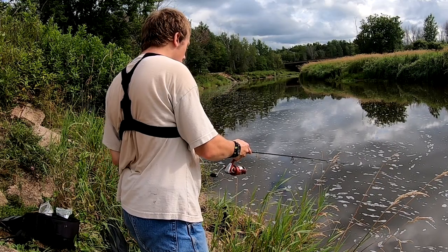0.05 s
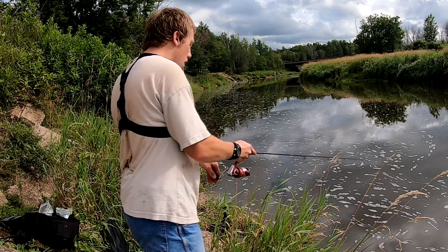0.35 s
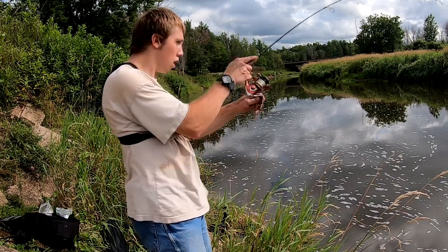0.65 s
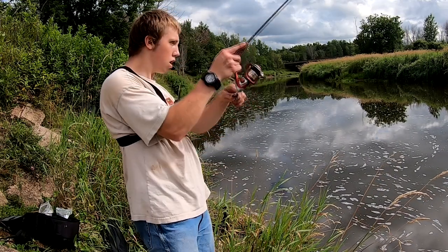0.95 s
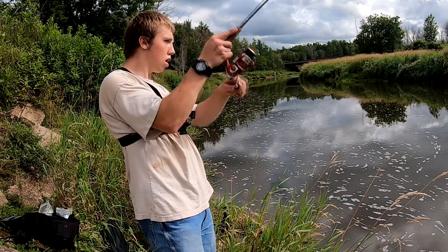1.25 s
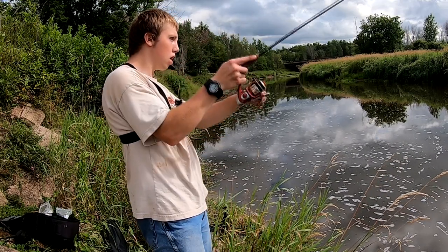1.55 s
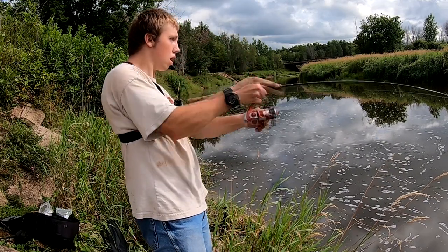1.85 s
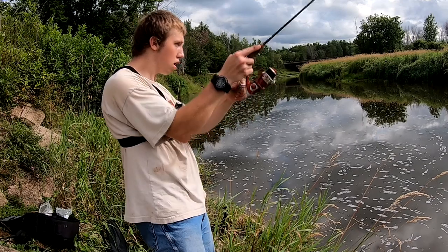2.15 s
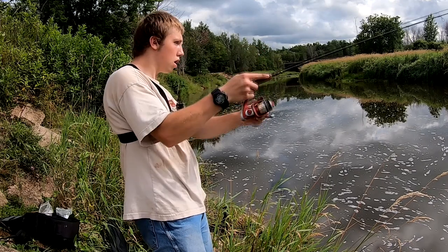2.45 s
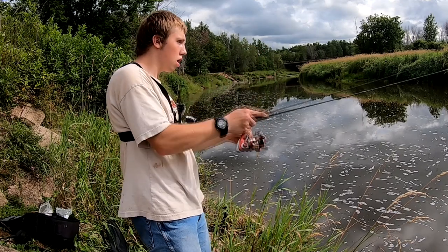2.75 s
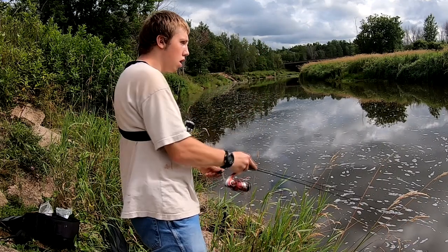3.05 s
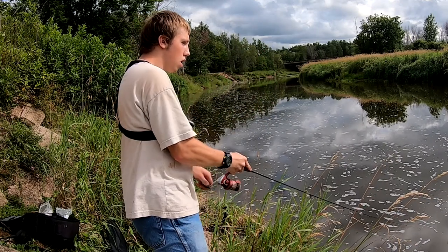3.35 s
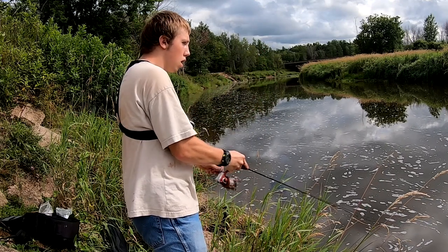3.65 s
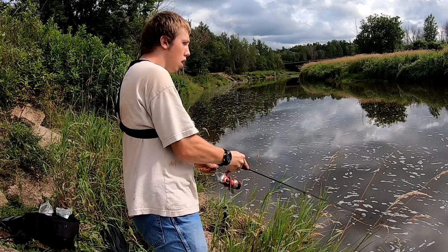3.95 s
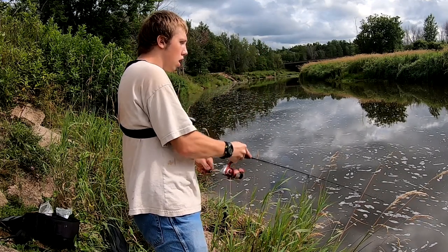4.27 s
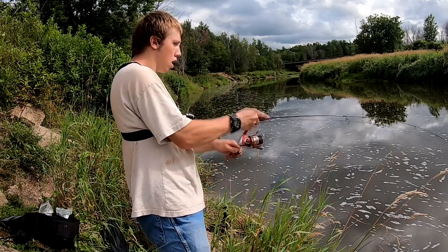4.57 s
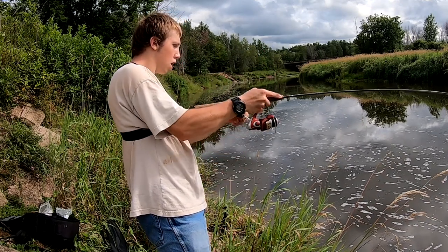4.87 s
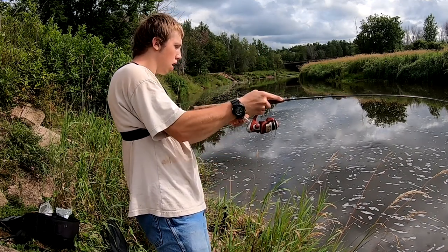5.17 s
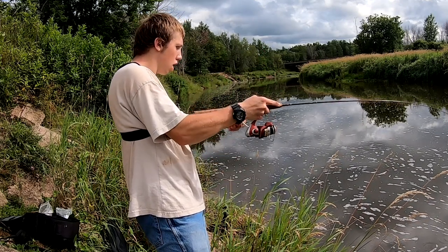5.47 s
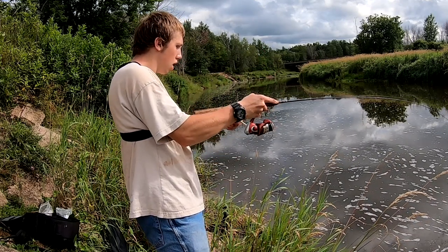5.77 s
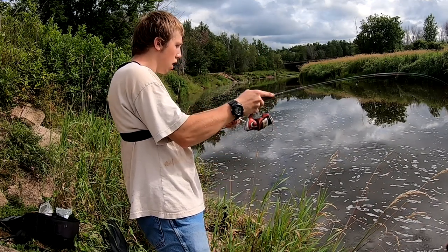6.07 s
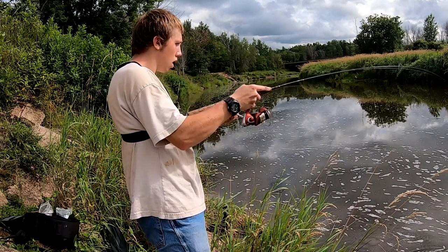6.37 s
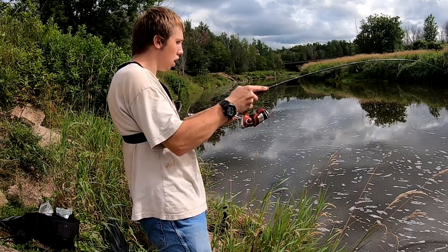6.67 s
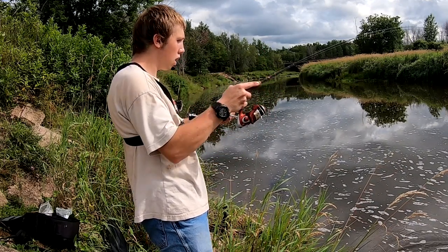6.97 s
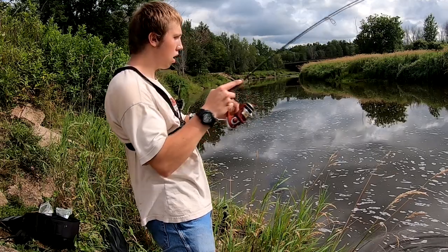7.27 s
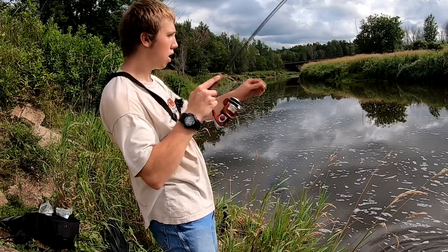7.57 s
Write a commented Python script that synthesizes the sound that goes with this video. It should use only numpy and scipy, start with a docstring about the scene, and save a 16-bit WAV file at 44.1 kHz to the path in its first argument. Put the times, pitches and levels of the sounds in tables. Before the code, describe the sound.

A fishing reel ticks, whirrs and briefly buzzes, then a hooked fish splashes and thrashes in a river under a light breeze.

```python
"""A light breeze blows over a quiet riverbank, and a small bird calls now and then. An angler's tackle
ticks and the gears of a spinning reel whirr. Twice the rod swishes up to set the hook, and each time the
drag (the reel's slipping brake) buzzes and leaves the spool ringing. From about 2 s a fish splashes,
then the angler winds it in. From 5 s it thrashes again, with spray, ticking drops, ringing bubbles and
one deep plop just after 6 s. The last drops patter back onto the river and the breeze blows on."""
import sys
import numpy as np
from scipy import signal
from scipy.fft import rfft, irfft, next_fast_len
from scipy.io import wavfile
from scipy.ndimage import uniform_filter1d

SR = 44100
rng = np.random.default_rng(int(sys.argv[2]) if len(sys.argv) > 2 else 0)


def bounce(signal):
    """Save signal as a 16-bit WAV file at the path given by the first command-line argument."""
    frames = np.transpose(np.atleast_2d(signal))
    limited = np.clip(frames, -1, 1)
    pcm = np.round(limited * 32767).astype(np.int16)
    wavfile.write(sys.argv[1], SR, pcm)


N = 340452
T = np.arange(N) / SR

# Levels in a table compare its rows; the functions add their own gains on top.
# tone of the hiss of leaves and river: frequency_hz, level_db
AIR_TONE = [(59, -40), (100, -3), (335, -9), (389, -8), (433, -11), (705, -11.5), (872, -11.5), (1360, -14),
            (2000, -17.5), (3120, -20), (3320, -22), (5420, -14.5), (7450, -17.5), (11600, -19.5),
            (16000, -23)]
# tone of the wind's rumble: frequency_hz, level_db
RUMBLE_TONE = [(2, 26), (6, 32.5), (11, 21), (20, 5.5), (40, 0), (70, -4.5), (110, -13), (220, -31.5)]
# gusts of wind: peak_s, half_width_s, level_db
WIND_GUSTS = [(.52, .12, -50), (2.55, 0.21, -53), (3.76, 0.15, -66), (4.82, 0.041, -48.5),
              (6.85, 0.34, -51), (7.62, 0.073, -60)]
# tone of the difference between left and right: frequency_hz, level_db
SIDE_TONE = [(25, -25), (60, -21), (140, -23), (280, -12.5), (600, -3), (1200, -10.5), (2200, -25),
             (4000, 7.5), (8000, 16), (16000, 0.5)]
# tone of small swirls of air: frequency_hz, level_db
EDDY_TONE = [(25, 11), (130, -17), (300, -3), (600, -11)]
# bird calls: start_s, length_s, top_pitch_hz, level_db
BIRD_CALLS = [(1.738, .052, 3580, -47), (3.355, .046, 3520, -49), (4.315, .042, 3520, -51),
              (5.466, .052, 3520, -49), (6.745, .05, 3580, -47)]
# the fish ploughs along the surface: peak_s, half_width_s, spray_db, churn_db
FISH_SURGES = [(2.93, 0.15, -40, -46), (6.02, 0.18, -46.5, -49)]
# the fish slaps the water: start_s, length_s, spray_db, churn_db
FISH_SLAPS = [(2.111, 0.037, -39.5, -48.5), (2.165, 0.044, -48, -49.5), (2.475, 0.019, -32.5, -46),
              (2.565, 0.01, -37.5, -42), (2.578, 0.02, -36.5, -43.5), (2.637, 0.017, -52, -45.5),
              (2.688, .04, -52, -49), (5.025, .014, -49, -61), (5.072, .012, -41.5, -62),
              (5.252, 0.016, -41, -68), (5.345, 0.044, -44.5, -43.5), (5.392, 0.013, -35, -37.5),
              (5.604, 0.01, -43.5, -48), (5.725, .0098, -34.5, -52), (5.75, .0064, -39, -41.5),
              (5.835, 0.027, -31, -35.5), (5.903, 0.014, -39, -44), (6.014, 0.0068, -33, -49),
              (6.057, .021, -34, -36.5), (6.144, 0.018, -45, -31), (6.163, 0.019, -50, -33)]
# tone of flying spray: frequency_hz, level_db
SPRAY_TONE = [(880, -20), (1500, 1), (1640, 0), (2830, -6.5), (2970, -9.5), (5330, 4), (5770, 2.5),
              (7690, 4), (14100, -5.5), (16000, -15)]
# tone of sloshing water: frequency_hz, level_db
SLOSH_TONE = [(150, -23.5), (280, -8.5), (450, -1.5), (800, -0.5), (1800, -0.5), (3500, -8.0)]
# the biggest pockets of trapped air: start_s, pitch_hz, level_db, life_cycles
BIG_BUBBLES = [(2.580, 1850, -18.5, 18), (2.579, 1070, -28.5, 25), (2.694, 1054, -27, 20),
               (2.723, 616, -29.5, 15), (3.093, 1240, -36, 28), (3.212, 1200, -39, 50),
               (4.842, 1900, -35, 14), (5.035, 1870, -38, 40), (5.075, 1550, -39.5, 40),
               (5.363, 1190, -26, 22), (5.37, 950, -26, 14), (5.371, 700, -29, 20),
               (5.381, 3200, -30.5, 31), (5.386, 2380, -29, 31), (5.552, 1710, -38, 78),
               (5.612, 1750, -30, 19), (5.857, 1110, -26.5, 18), (5.873, 1650, -26.5, 29),
               (5.922, 1620, -27.5, 26), (5.984, 1380, -29, 29), (6.074, 720, -26, 24),
               (6.092, 650, -32, 32), (6.132, 620, -30, 26), (6.142, 2820, -24.5, 30),
               (6.463, 5740, -30.5, 52), (6.492, 1000, -39, 21), (6.1505, 760, -15.5, 14),
               (6.153, 435, -31, 36), (6.1568, 960, -8, 13), (6.157, 1340, -16, 10)]
# sharp ticks of reel and rod and, amid the splashing, of water drops:
# start_s, click_db, snap_db (compared with the click), knock_db
SHARP_TICKS = [(0.371, -37.5, -11, -65), (.4084, -37.5, -12, -65), (.4515, -38, -21, -50),
               (.63, -35, -10, -36.5), (0.6806, -25, -8.5, -28.5), (0.7608, -19, -0.5, -29),
               (0.7671, -26, 2, -19), (0.8628, -25, -8, -47), (0.9257, -33.5, -14, -46),
               (1.8933, -30, -7.5, -31.5), (2.0161, -24, -13, -39), (2.287, -23.5, -18, -41),
               (2.3977, -23, -22, -48), (2.9921, -25.5, -13, -57), (4.9509, -30, -8, -62),
               (5.0462, -34.5, -23, -61), (5.331, -35, -22, -49), (5.5237, -34.5, -4, -55),
               (5.965, -32, -19, -42), (6.1913, -34, -6, -50), (6.2434, -36, -24, -43),
               (6.6733, -40, -7, -59)]
# tone of a tick's click: frequency_hz, level_db
CLICK_TONE = [(180, -40), (300, 0), (457, -8.5), (1460, 0.5), (2000, 1), (3660, 4.5), (5340, 12.5),
              (6490, 9), (8140, 9.5), (9750, -15.5), (11000, -50), (14300, -39), (22000, -120)]
# upward sweeps of the rod: start_s, length_s, whistle_db, swish_db
ROD_STRIKES = [(0.687, .078, -38.5, -31.5), (1.922, .09, -40, -43)]
# spells of turning the reel's handle: start_s, length_s, whirr_db, growl_db
CRANK_SPELLS = [(.62, 0.33, -50.5, -60.5), (.98, .21, -51.5, -59.5), (1.19, .31, -47.5, -60),
                (1.6, 0.27, -50, -60), (3.2, 0.31, -55, -65), (3.52, .2, -58.5, -62.5),
                (3.71, 0.46, -51, -56.5), (4.19, 0.17, -54.5, -58.5), (4.38, 0.4, -50.5, -58)]
# tone of the line running over its roller: frequency_hz, level_db
WHIRR_TONE = [(1000, -25), (1700, -14), (1920, 2.5), (2230, 0), (2430, -10), (3160, -7.5), (3530, -3),
              (3880, -10), (4430, -1), (6320, -2.5), (7410, 3.5), (8610, 1.5), (10500, -14), (12500, -12),
              (16000, -26)]
# pitches at which the reel's body rings: pitch_hz, width_hz, level_db
REEL_RESONANCES = [(1135, 300, 0.5), (1920, 260, 3), (2370, 270, -1), (2650, 240, -5)]
# slips of the drag: start_s, length_s, spin_up_s, click_db
DRAG_SLIPS = [(.7605, .088, .004, -21), (2.003, .106, .02, -18.5)]
# tone of the drag's clicks: frequency_hz, level_db
DRAG_TONE = [(150, -65), (250, -17), (906, -15.5), (1260, -7), (1730, -11.5), (1950, -10), (3520, -12),
             (4410, -1), (5070, -5), (5630, 6), (6360, -2.5), (8120, 7.5), (10000, -6.5), (13900, 1.5),
             (16000, -19)]
# ringing notes of the spool: pitch_hz, ring_s (time to fade by 60 dB), first_slip_db, second_slip_db
SPOOL_NOTES = [(2745, .3, -32, -33), (4530, .25, -22, -9), (6865, .32, -12, -16), (7865, .22, -24, -23),
               (11000, .18, -32, -23)]


def amp(db):
    """Turn decibels into a gain."""
    return 10 ** (np.asarray(db) / 20)


def unit(x):
    """Scale a sound to an average (rms) level of 1."""
    return x / np.sqrt(np.mean(x ** 2) + 1e-20)


def noise():
    """White noise as long as the scene."""
    return rng.standard_normal(N)


def add(out, start_s, x):
    """Mix x into out, beginning at start_s."""
    i = int(start_s * SR)
    out[i:i + len(x)] += x[:N - i]


def colour(x, tone):
    """Shape a sound with a tone table, fading beyond its ends; white noise keeps its overall level."""
    hz, db = np.transpose(tone)
    n = next_fast_len(N + SR // 2, real=True) // 2 * 2
    octave, known = np.log2(np.maximum(np.fft.rfftfreq(n, 1 / SR), 1)), np.log2(hz)
    beyond = abs(octave - np.clip(octave, known[0], known[-1]))
    cepstrum = irfft(np.log(amp(np.interp(octave, known, db) - 10 * beyond)))
    # this fold makes the filter ring after a sound, never before it
    cepstrum[1:n // 2] *= 2
    cepstrum[n // 2 + 1:] = 0
    response = np.exp(rfft(cepstrum))
    noise_gain = np.sqrt(np.mean(abs(response) ** 2))
    return irfft(rfft(x, n) * response / noise_gain)[:N]


def resonate(x, hz, width_hz):
    """Let through a band of sound around one pitch."""
    return signal.lfilter(*signal.iirpeak(min(hz, SR / 2.2), hz / width_hz, SR), x)


def wander(rate_hz):
    """A random curve, mostly between -1 and 1, that heads for a new value rate_hz times a second."""
    points = rng.standard_normal(N // 8)
    return np.interp(T * rate_hz, np.arange(len(points)), points)


def hump(peak_s, half_width_s):
    """A smooth swell that reaches 1 at peak_s."""
    return np.exp(-((T - peak_s) / half_width_s) ** 2)


def patter(per_second, spread_db):
    """Tiny clicks at random times and of uneven size."""
    clicks = (rng.random(N) < per_second / SR) * np.sign(noise())
    return unit(clicks * amp(spread_db * np.clip(noise(), -2, 2)))


def delay(x, delay_s):
    """The same sound a little later."""
    return np.interp(T - delay_s, T, x, left=0)


def scatter(x, fade_s):
    """Many faint echoes off grass and trees."""
    t = np.arange(SR // 4) / SR
    echoes = rng.standard_normal(len(t)) * np.exp(-t / fade_s)
    return signal.fftconvolve(x, echoes / np.linalg.norm(echoes))[:N]


def breeze(hiss_db=-53.07):
    """Leaves and river hiss softly; wind pushes on the microphone with a rumble that swells in gusts."""
    hiss = colour(noise(), AIR_TONE) * amp(hiss_db + .5 * wander(2.76))
    light_wind = amp(-57.5 + 2 * wander(4))
    gusts = sum(amp(db) * hump(peak_s, half_width_s) for peak_s, half_width_s, db in WIND_GUSTS)
    return hiss + colour(noise(), RUMBLE_TONE) * (light_wind + gusts) * amp(22)


def bird(pitch_arch=0.198, overtone_db=-7):
    """Short, husky calls that rise and fall in pitch, blurred by the trees."""
    out = np.zeros(N)
    for start_s, length_s, top_hz, db in BIRD_CALLS:
        progress = np.linspace(0, 1, int(length_s * SR))
        arch = 1 - pitch_arch * (2 * progress ** .8 - 1) ** 2
        pitch_hz = top_hz * arch * (1 + .045 * wander(900)[:len(progress)])
        phase = np.pi * np.cumsum(pitch_hz) / SR  # half the pitch: the second harmonic carries the call
        swell = np.sin(np.pi * progress) * amp(db + 3 * wander(400)[:len(progress)])
        overtone = amp(overtone_db) * (1 - progress) * np.sin(3 * phase)
        add(out, start_s, swell * (np.sin(2 * phase) + overtone))
    return out + amp(-5) * scatter(out, fade_s=.015)


def bubble(hz, cycles, glide):
    """Trapped air rings and fades; its pitch rises by the share `glide` as it nears the surface."""
    life_s = cycles / hz
    t = np.arange(int(life_s * SR)) / SR
    onset = 1 - np.exp(-(t * hz / .7) ** 2)
    swell = onset * np.exp(-np.log(1000) * t / life_s)  # 60 dB down by the end
    return swell / swell.max() * np.sin(2 * np.pi * hz * t * (1 + glide * t / life_s / 2))


def froth(low_hz, high_hz, cycles, spread_db, count=3600):
    """A crowd of short-lived bubbles of all sizes."""
    out = np.zeros(N)
    for when, height, life, loudness in rng.random((count, 4)):
        hz = low_hz * (high_hz / low_hz) ** height
        add(out, when * T[-1], amp(spread_db * loudness) * bubble(hz, cycles * (.5 + life), glide=0.21))
    return unit(out)


def drips(first_s=4.8, last_s=6.9, low_hz=1800, high_hz=9000, tap_s=0.0016, count=90):
    """Stray drops fall back onto the river: each taps the surface and traps a tiny bubble."""
    rings, taps = np.zeros((2, N))
    tap_fade = np.exp(-np.arange(SR // 100) / (tap_s * SR))
    for when, height, softness in rng.random((count, 3)):
        start_s = first_s + when * (last_s - first_s)
        hz = low_hz * (high_hz / low_hz) ** height
        gain = amp(-40.5 - 12 * softness)
        add(rings, start_s, gain * bubble(hz, cycles=22, glide=0.23))
        add(taps, start_s, gain * amp(-5) * tap_fade)
    return rings + 2 * resonate(taps * noise(), hz=9000, width_hz=7000)


def bubble_trails(low_hz=650, high_hz=3380, within_s=.06, per_slap=5):
    """Every slap of the fish leaves a few small bubbles behind it."""
    out = np.zeros(N)
    for start_s, _, _, churn_db in FISH_SLAPS:
        for when, height, softness in rng.random((per_slap, 3)):
            hz = low_hz * (high_hz / low_hz) ** height
            gain = amp(churn_db - 1.5 - 10 * softness)
            add(out, start_s + within_s * when ** 2, gain * bubble(hz, cycles=22, glide=0.16))
    return out


def plops(glide_per_cycle=0.0058, bank_echo_s=.00568):
    """Single bubbles and drips ring out; the bank sends back a quick echo and a faint blur."""
    out = bubble_trails() + drips()
    for start_s, hz, db, cycles in BIG_BUBBLES:
        add(out, start_s, amp(db) * bubble(hz, cycles, glide=cycles * glide_per_cycle))
    out = signal.sosfilt(signal.butter(3, 300, "high", fs=SR, output="sos"), out)
    echo = -amp(-6) * delay(out, bank_echo_s)  # the wave comes back upside down
    return out + echo + amp(-16) * scatter(out, fade_s=0.027)


def churning():
    """Bubbles gurgle over the dull slosh of moving water."""
    gurgle = froth(low_hz=560, high_hz=2600, cycles=15, spread_db=12)
    slosh = colour(noise(), SLOSH_TONE)
    return unit(gurgle + 0.92 * slosh)


def splashing(rise_s=0.0012, fall_s=0.017, wash_s=0.072, stir_s=0.39):
    """Water hisses as the fish ploughs along; each slap throws spray, churns air under, leaves a wash."""
    spray_gain, churn_gain = np.zeros((2, N))
    for peak_s, half_width_s, spray_db, churn_db in FISH_SURGES:
        stirred = amp(-6.5) * hump(peak_s, stir_s)  # the water also moves before and after
        surge = np.maximum(hump(peak_s, half_width_s), stirred)
        spray_gain += amp(spray_db) * surge
        churn_gain += amp(churn_db) * surge
    t = np.arange(SR) / SR
    onset = 1 - np.exp(-t / rise_s)
    wash = onset * np.exp(-t / wash_s)
    for start_s, length_s, spray_db, churn_db in FISH_SLAPS:
        slap = onset * np.exp(-t / length_s / 2 - np.maximum(t - length_s, 0) / fall_s)
        add(spray_gain, start_s, amp(spray_db - 1) * np.maximum(slap, amp(-22.5) * wash))
        add(churn_gain, start_s, amp(churn_db) * np.maximum(slap, amp(-31.5) * wash))
    fizz = froth(low_hz=2600, high_hz=11000, cycles=22, spread_db=17)
    drops = unit(patter(per_second=1500, spread_db=5) + .75 * noise() + .9 * fizz)
    spray = unit(drops * amp(2 * wander(220)))
    return colour(spray * spray_gain, SPRAY_TONE) + churn_gain * churning()


def sharp_ticks(click_s=0.00099, rattle_s=0.0087, knock_hz=1980, knock_s=0.0021):
    """Reel, rod and water drops tick: each is a click with a bright snap, a short rattle and a knock."""
    clicks, snaps, knocks = np.zeros((3, N))
    t = np.arange(SR // 25) / SR
    onset = 1 - np.exp(-t / .0005)
    fade = onset * (np.exp(-t / click_s) + 0.16 * np.exp(-t / rattle_s))
    knock = np.exp(-t / knock_s) * np.sin(2 * np.pi * knock_hz * t)
    for start_s, click_db, snap_db, knock_db in SHARP_TICKS:
        burst = fade * rng.standard_normal(len(t))
        add(clicks, start_s, amp(click_db + 3.5) * burst)
        add(snaps, start_s, amp(click_db + snap_db + 7) * burst)
        add(knocks, start_s, amp(knock_db + 3) * knock)
    return colour(clicks, CLICK_TONE) + 2 * resonate(snaps, hz=10500, width_hz=4000) + knocks


def rod_strikes(slow_hz=5200, fast_hz=10500):
    """The tight line whistles higher as the rod gains speed, and the rod swishes through the air."""
    out = np.zeros(N)
    rush = unit(resonate(resonate(noise(), hz=1500, width_hz=2800), hz=1600, width_hz=2800))
    for start_s, length_s, whistle_db, swish_db in ROD_STRIKES:
        speed = np.linspace(0, 1, int(length_s * SR))
        flutter = 1 + 0.202 * wander(5000)[:len(speed)]
        hz = (slow_hz + (fast_hz - slow_hz) * speed) * flutter
        whistle = amp(whistle_db) * speed * np.sin(2 * np.pi * np.cumsum(hz) / SR)
        swish = amp(swish_db) * speed ** 4 * rush[:len(speed)]
        add(out, start_s, whistle + swish)
    return out


def cranking(rise_s=0.021, fall_s=0.032, build_db=3):
    """How loud line and gears are as the handle speeds up, the load builds and the handle stops."""
    whirr_gain, growl_gain = np.zeros((2, N))
    for start_s, length_s, whirr_db, growl_db in CRANK_SPELLS:
        since_s = np.maximum(T - start_s, 0)
        speed = (1 - np.exp(-since_s / rise_s)) * np.exp(-np.maximum(since_s - length_s, 0) / fall_s)
        load_db = build_db * (np.minimum(since_s / length_s, 1) - .5)
        whirr_gain += speed * amp(whirr_db + load_db)
        growl_gain += speed * amp(growl_db + load_db)
    return whirr_gain, growl_gain


def winding(rotor_hz=10, teeth_hz=605, rod_high_until_s=2.5):
    """Line rasps over the roller while the gear teeth hum through the reel's body."""
    # the load swings with each turn of the rotor, so the teeth warble in pitch and loudness
    turn = np.sin(2 * np.pi * rotor_hz * T + .8 * wander(4))
    hand = wander(12)  # the hand cranks unevenly
    pitch_hz = teeth_hz * (1 + .045 * hand) * (1 + .018 * turn + .02 * wander(250))
    phase = 2 * np.pi * np.cumsum(pitch_hz) / SR
    teeth = unit(sum(np.sin(harmonic * phase) * amp(6 * wander(20)) for harmonic in range(2, 6)))
    push = teeth * amp(2.5 * turn) + 3 * noise()
    growl = unit(sum(amp(db) * resonate(push, hz, width_hz) for hz, width_hz, db in REEL_RESONANCES))
    grit = unit(patter(per_second=5000, spread_db=6) * amp(3 * wander(110)))
    # the line sounds brighter while the rod is held high
    sheen = unit(resonate(grit, hz=11500, width_hz=2200)) * amp(-11) * (T < rod_high_until_s)
    whirr = amp(-0.3) * colour(grit, WHIRR_TONE) + sheen
    whirr_gain, growl_gain = cranking()
    return (whirr * whirr_gain + amp(1) * growl * growl_gain) * amp(1.54 * hand)


def drag_buzz(fast_hz=520.6, slow_hz=109.7, stall_db=-7.5, click_s=0.00061, scrape_db=-14):
    """The spool spins up and slows; a small catch snaps over its teeth and sets it ringing."""
    snaps, ring = np.zeros((2, N))
    for slip, (start_s, length_s, spin_up_s, click_db) in enumerate(DRAG_SLIPS):
        progress = np.clip((T - start_s) / length_s, 0, 1)
        spin = np.clip((T - start_s) / spin_up_s, 0, 1) * (progress < 1)
        rate_hz = spin * (fast_hz + (slow_hz - fast_hz) * progress ** 2)
        strength = spin * amp(click_db + stall_db * progress ** 4)  # softer just before it stops
        teeth_passed = np.ceil(np.cumsum(rate_hz * np.exp(0.057 * wander(300))) / SR)
        hits = np.diff(teeth_passed, prepend=0) * strength * amp(3.5 * wander(400))
        force = signal.lfilter([1], [1, -np.exp(-1 / (click_s * SR))], hits + 1e-18)
        force += amp(scrape_db) * uniform_filter1d(strength, int(0.047 * SR))
        snaps += force
        for hz, ring_s, *slip_db in SPOOL_NOTES:
            keep = np.exp(-2 * np.log(1000) / (ring_s * SR))
            energy = signal.lfilter([1 - keep], [1, -keep], force ** 2)  # builds up, then leaks away
            wobble = 1.5 * wander(110)  # the turning spool blurs its own notes
            ring += amp(slip_db[slip]) * np.sqrt(energy) * np.sin(2 * np.pi * hz * T + wobble)
    return colour(snaps * noise(), DRAG_TONE) + ring


def scene(echo_db=-28, echo_s=.00499):
    """Reel, fish and bird lie straight ahead; a faint echo and the air around make the sound wide."""
    tackle = rod_strikes() + drag_buzz() + winding()
    centre = tackle + sharp_ticks() + splashing() + plops() + bird() + breeze()
    air_around = amp(-72) * colour(noise(), AIR_TONE)
    eddies = amp(-74) * colour(noise(), EDDY_TONE)
    side = colour(amp(echo_db) * delay(centre, echo_s) + air_around, SIDE_TONE) + eddies
    return np.array([centre + side, centre - side])


def record(dry, top_hz=16000):
    """Cut away the very highest treble."""
    return signal.sosfilt(signal.ellip(10, .2, 75, top_hz, fs=SR, output="sos"), dry)


dry = scene()
out = record(dry)
bounce(out)
```